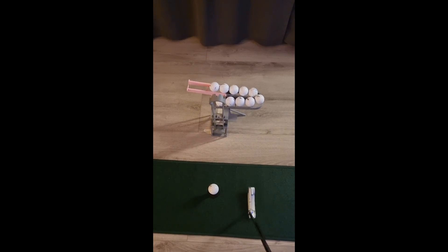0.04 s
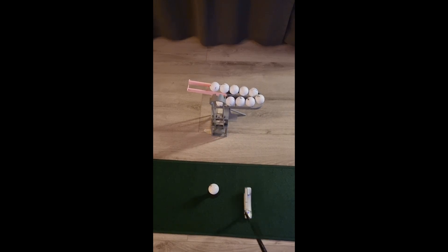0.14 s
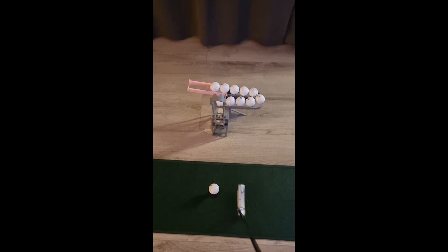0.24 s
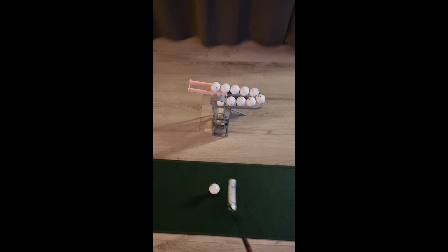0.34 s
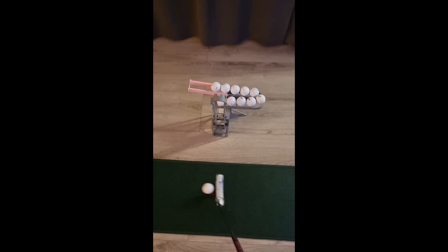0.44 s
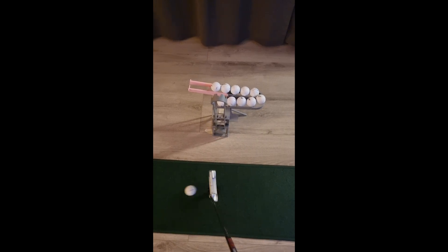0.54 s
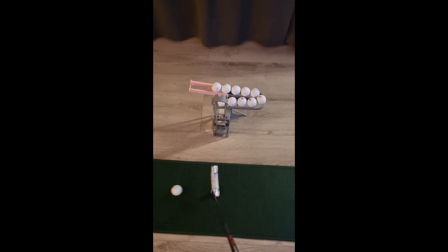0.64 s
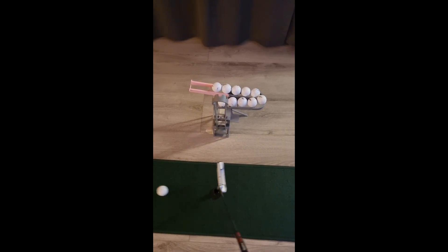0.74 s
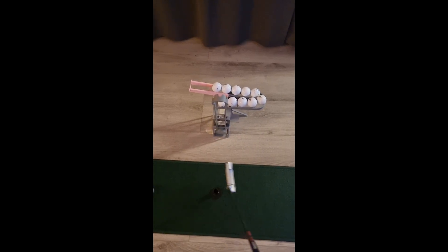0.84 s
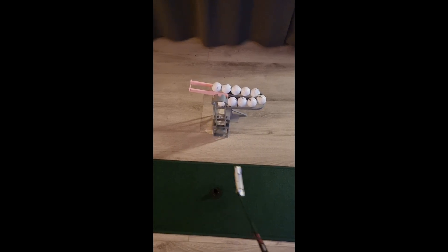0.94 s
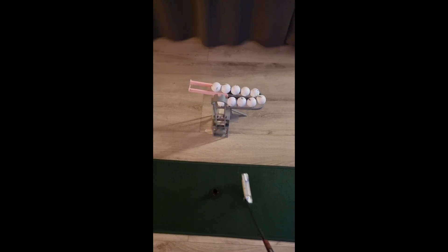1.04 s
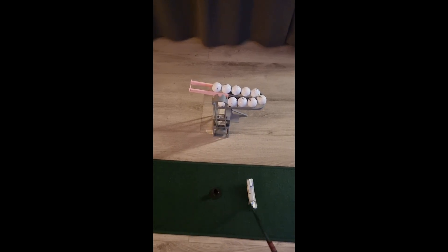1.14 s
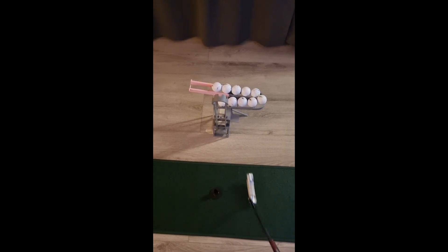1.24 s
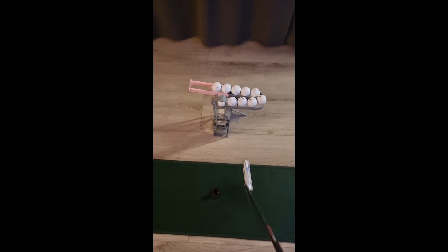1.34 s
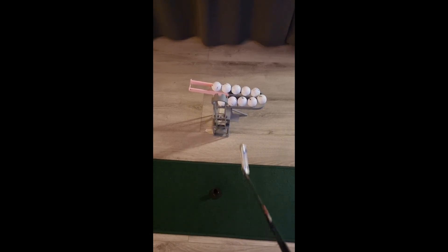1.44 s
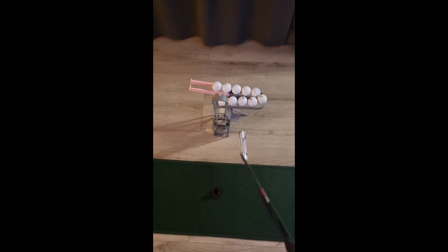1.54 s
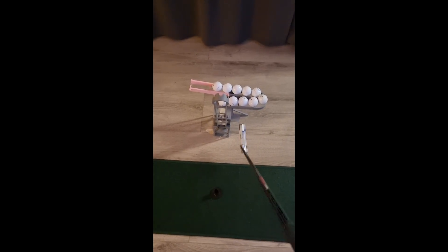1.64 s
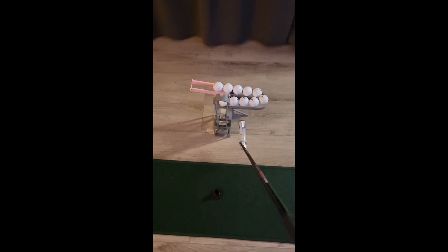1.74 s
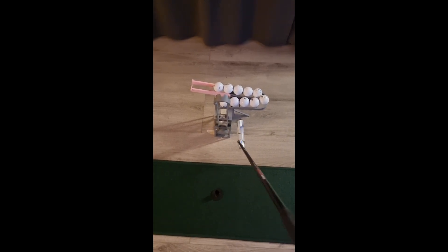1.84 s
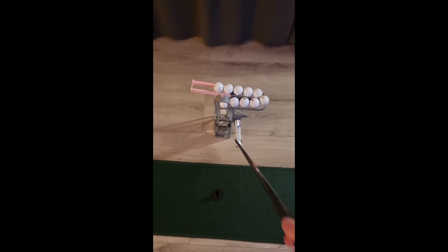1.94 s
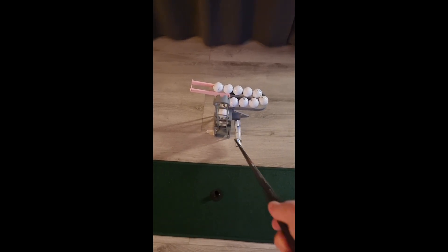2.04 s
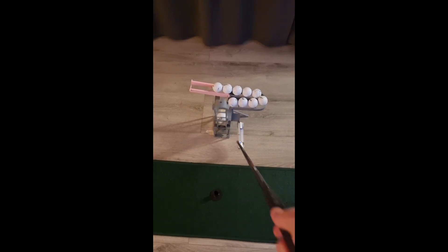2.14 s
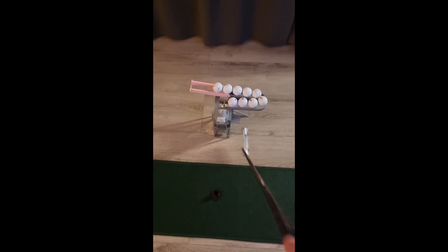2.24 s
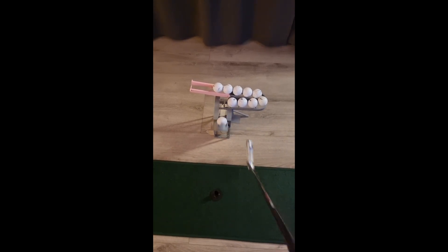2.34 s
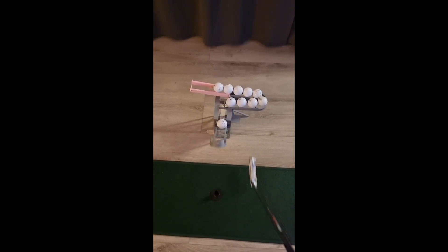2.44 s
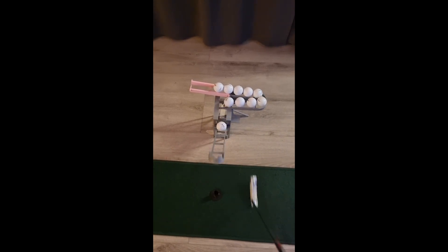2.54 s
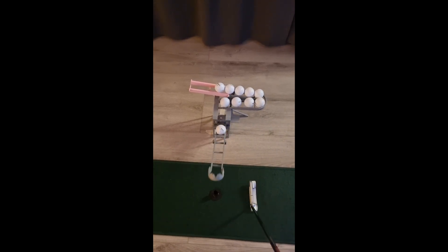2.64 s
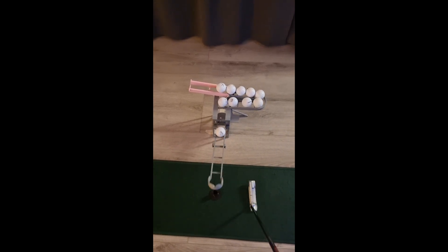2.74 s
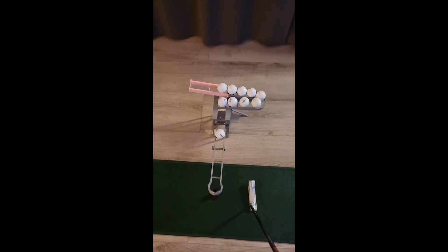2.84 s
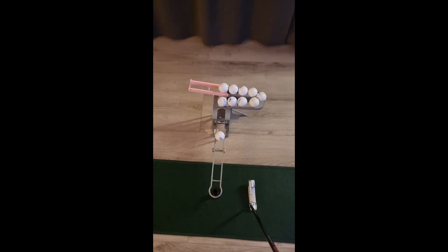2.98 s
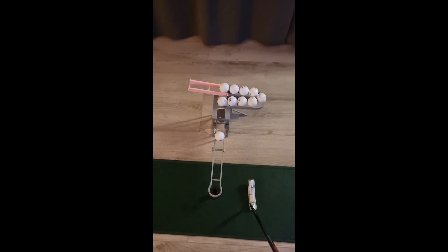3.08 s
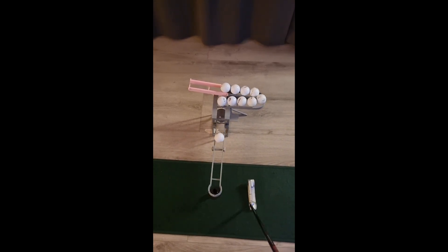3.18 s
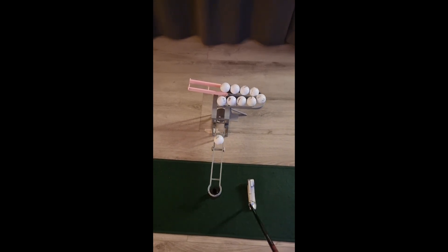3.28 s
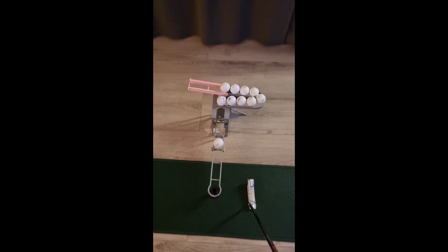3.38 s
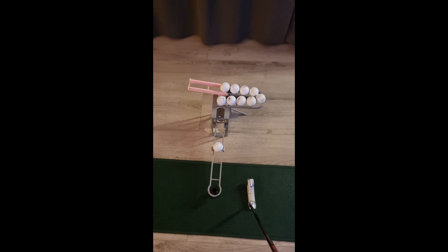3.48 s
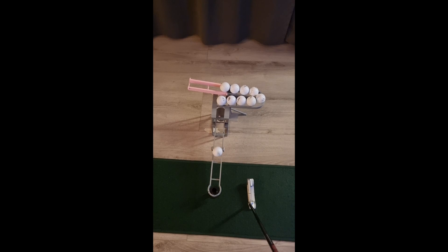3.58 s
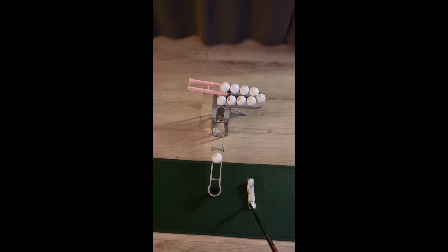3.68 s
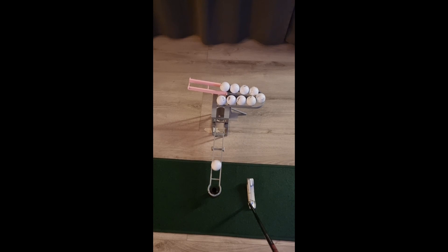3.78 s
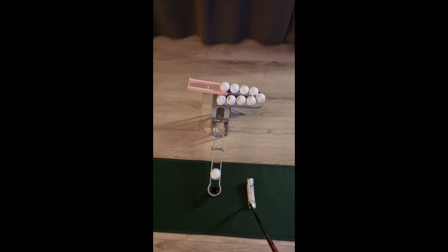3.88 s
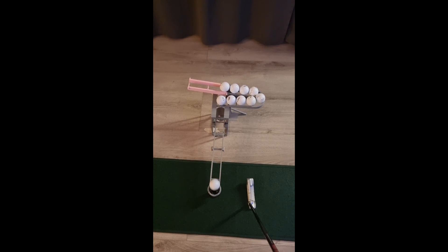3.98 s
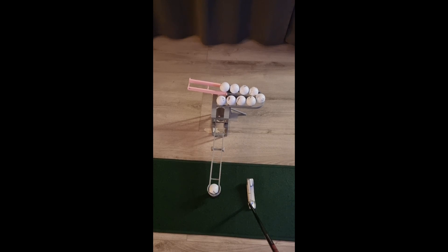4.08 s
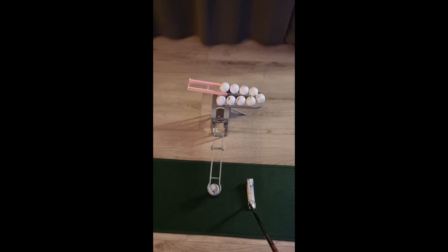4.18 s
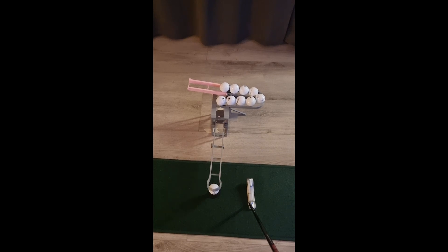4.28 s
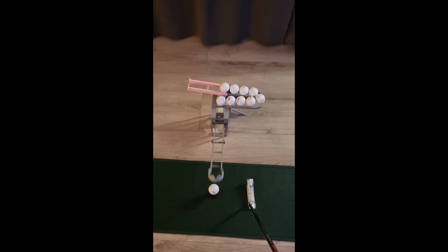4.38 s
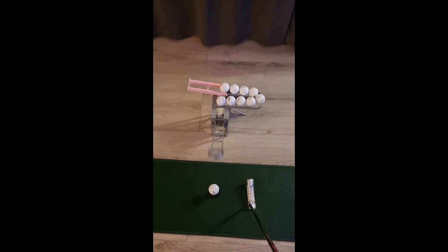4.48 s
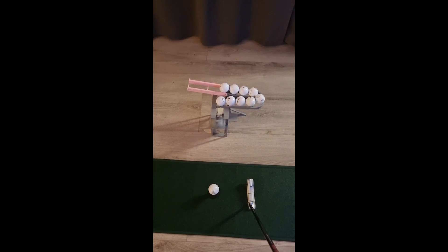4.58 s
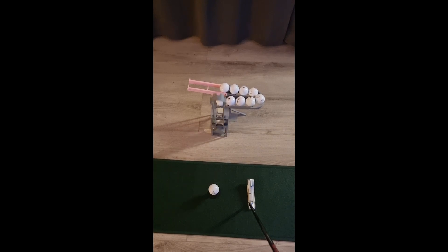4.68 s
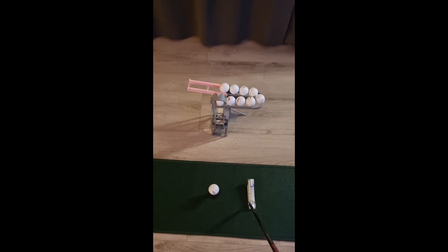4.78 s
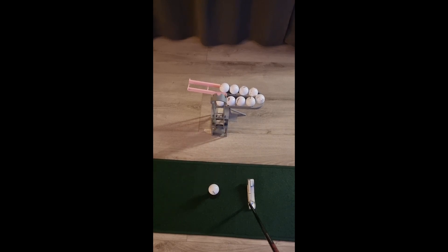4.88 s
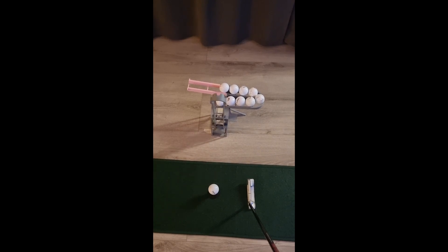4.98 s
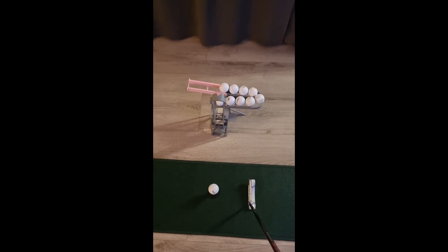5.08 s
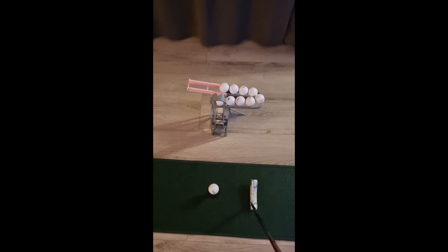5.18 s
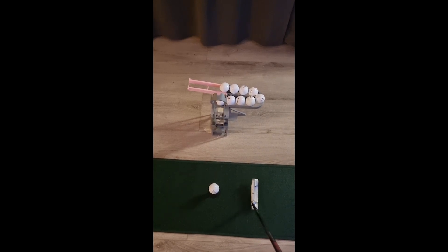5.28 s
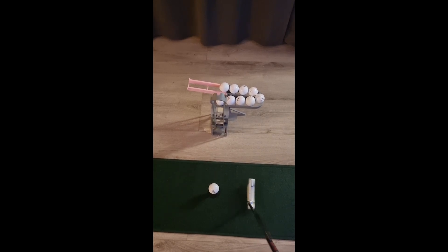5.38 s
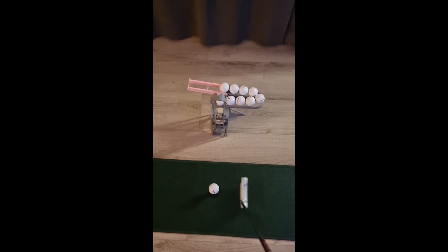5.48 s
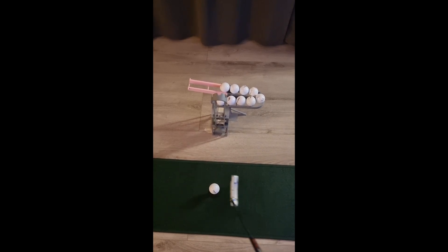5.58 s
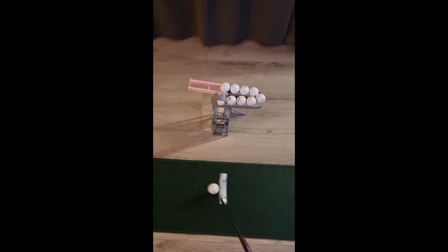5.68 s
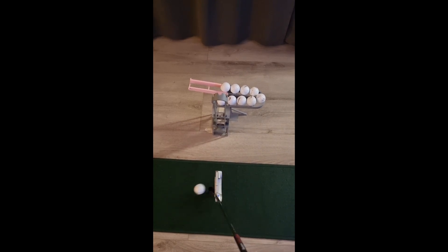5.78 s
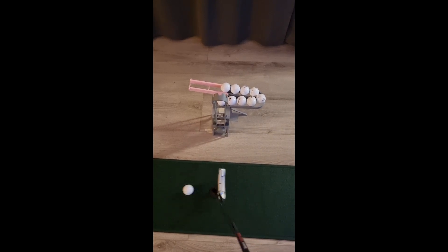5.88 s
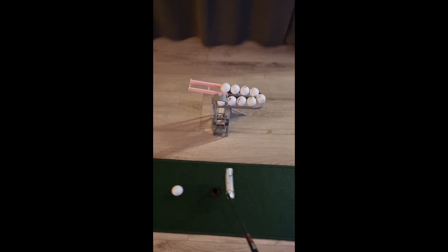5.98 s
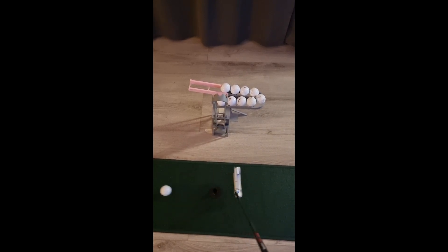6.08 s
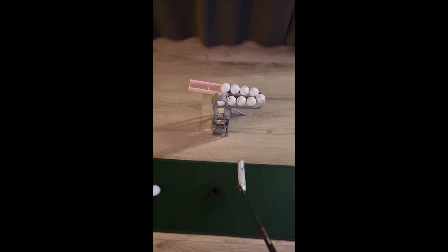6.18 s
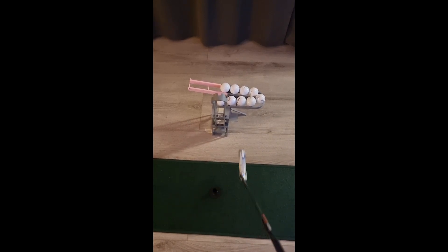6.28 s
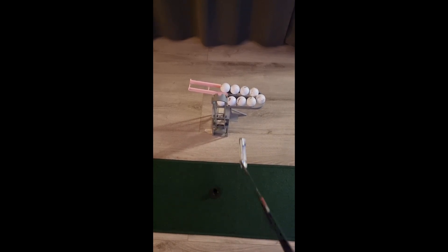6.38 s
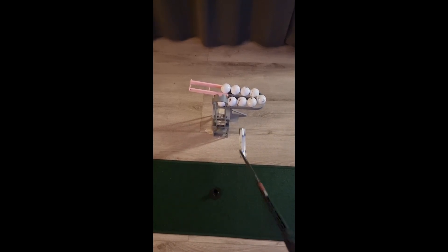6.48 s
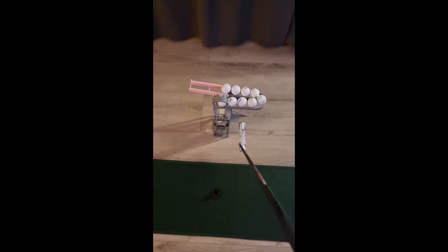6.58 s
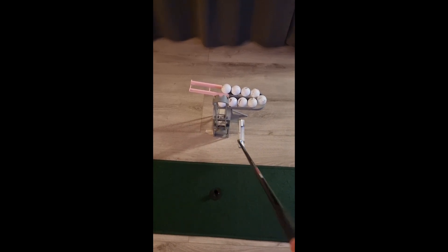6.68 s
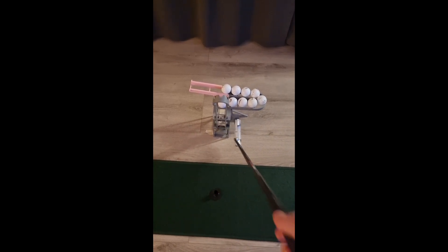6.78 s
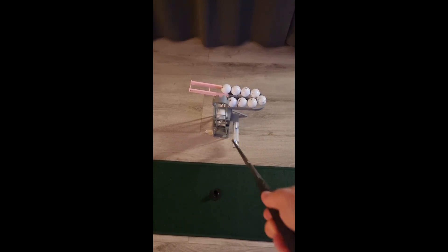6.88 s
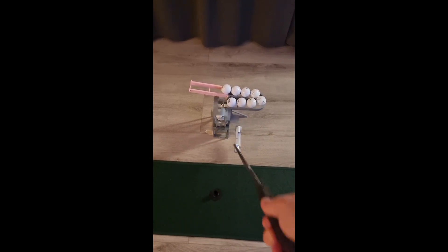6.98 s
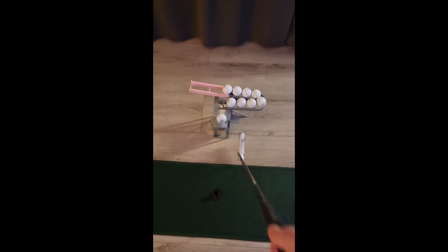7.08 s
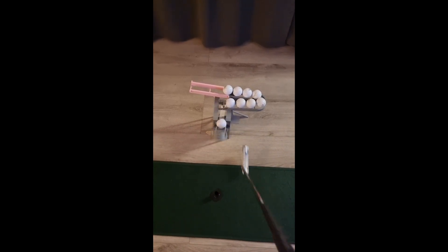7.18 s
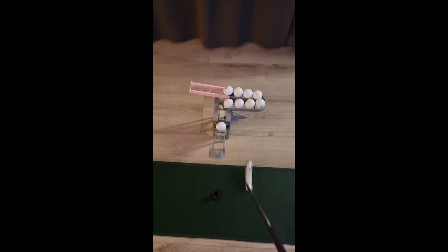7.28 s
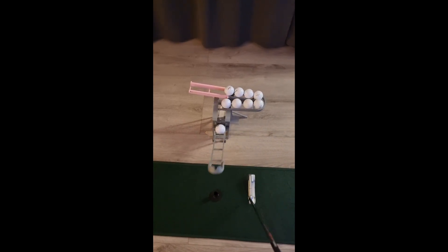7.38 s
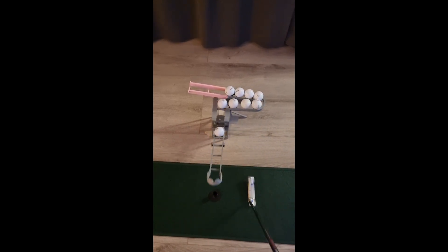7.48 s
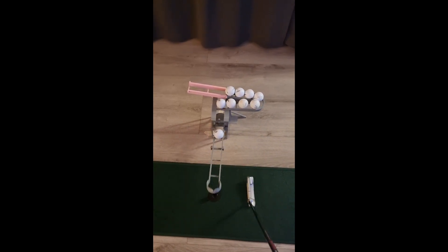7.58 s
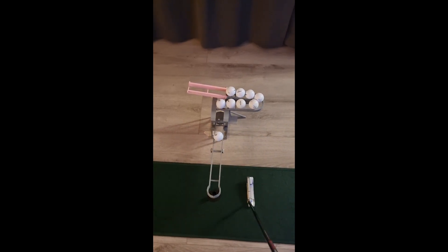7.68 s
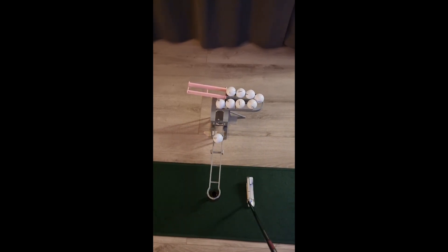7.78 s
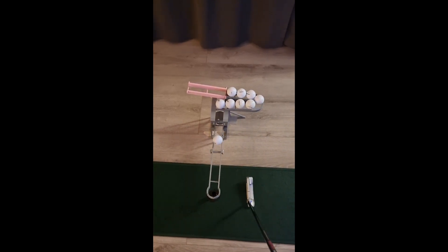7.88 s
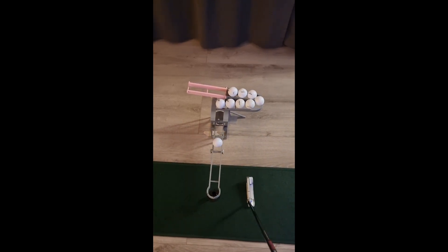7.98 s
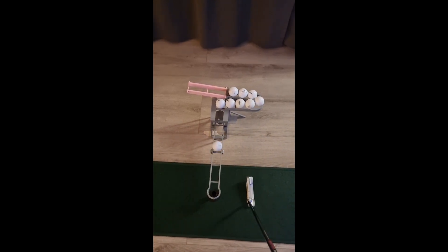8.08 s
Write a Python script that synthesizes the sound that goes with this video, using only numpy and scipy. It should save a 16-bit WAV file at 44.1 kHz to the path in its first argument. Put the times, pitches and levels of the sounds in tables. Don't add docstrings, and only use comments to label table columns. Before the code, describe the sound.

Two rounds of indoor putting: faint tap, dull thud, lever rattle, balls clacking, ramp knocking on wood, a ball rolling; the first ends with a slam.

```python
import sys
import numpy as np
from scipy import signal
from scipy.fft import rfft, irfft, next_fast_len
from scipy.io import wavfile
from scipy.ndimage import uniform_filter1d

SR = 44100
rng = np.random.default_rng(int(sys.argv[2]) if len(sys.argv) > 2 else 0)


def output_pcm(signal):
    pcm = np.clip(np.atleast_2d(signal).T, -1, 1) * 32767
    wavfile.write(sys.argv[1], SR, np.round(pcm).astype(np.int16))


def attenuation_scalar(level_db):
    decades = np.asarray(level_db, float) / 20
    return 10 ** decades


N = 358533

# f/Hz, density/dB per Hz
AIR = [(22, -16), (40, -5), (62, -7), (100, -9), (160, -4), (250, 1), (320, -5.5), (500, -9.5),
       (1000, -21.5), (2300, -32.5), (4000, -43), (8000, -55.5), (10500, -54), (12800, -44.5), (16000, -57)]
# f/Hz, correlation/1
SAME = [(30, 1), (180, 1), (550, 0.25), (1650, 0.52), (5000, 0.14)]
# t/s, peak level/dB,
# brightness/dB per octave
PUTTS = [
    (0.4858, -31, 2),
    (0.4935, -48, -4.5),
    (1.056, -50, 2.5),
    (5.7725, -30.5, -2),
    (5.7824, -38, 1.5),
    (5.80, -47, -2.5),
]
# f/Hz, level/dB
PUTTER = [(300, -22.5), (550, 4), (900, -7), (1700, 15.5), (2600, 0), (4100, 3.5), (6300, -16.5),
          (15000, -40)]
# f/Hz, level/dB, t60/s
BALL = [(300, -5.5, 0.06), (558, -6, 0.03), (810, 0.5, 0.02), (1250, -6, 0.03), (1850, -6, 0.015),
        (2578, -14, .05), (3100, -9.5, .012), (4050, -18, 0.045), (5000, -20, .015), (6300, -28, .04)]
# t/s, peak level/dB, contact/s
LANDINGS = [
    (0.616, -15.5, 0.0015),
    (0.636, -34, 0.0017),
    (0.727, -24, 0.0079),
    (0.772, -53, 0.008),
    (5.903, -16.5, 0.0011),
    (5.922, -35, 0.0022),
    (6.014, -29, 0.0048),
    (6.053, -44.5, 0.0047),
    (6.13, -58, 0.0018),
]
# f/Hz, level/dB, t60/s
BACKSTOP = [(79, -13, 0.26), (111, -1, 0.08), (165, 5, 0.071), (200.7, 3, 0.084), (219.7, -9.5, 0.18),
            (266.3, -5, 0.094), (312.7, -5, 0.12), (397, -13.5, 0.042), (520, -16.5, 0.038),
            (684, -16.5, 0.013), (825, -16, 0.011), (4530, -15, 0.02)]
# f/Hz, level/dB, t60/s
RACK = [(2000, -16, 0.015), (2760, -31, 0.013), (3050, -21.5, 0.025), (3190, -16.5, 0.038),
        (3400, -7.5, 0.0083)]
# f/Hz, level/dB, t60/s
HOLLOW = [(736, -3, 0.03), (800, -3, 0.025), (880, -6, 0.022), (1300, -2, 0.014)]
# f/Hz, level/dB, t60/s
WIRE = [(2230, -10, .06), (2290, -4, .11), (2345, -8, .06), (2395, -3, .14), (2470, -9, .06),
        (3250, -17, .05), (3420, -16, .07), (5300, -21, .05)]
# f/Hz, level/dB
SNAP = [(6800, 1), (7900, 3), (9500, -5.5), (11200, -5.5), (13200, -3), (15800, -7.5)]
SHELL = [(1200, -8), (1750, 0), (2300, 1.5), (3300, -3.5), (4600, 4.5), (5800, -12), (7600, -15.5)]
RAILS = [(1200, 3.5), (2000, 3.5), (3000, -14), (4700, -15), (7000, -42.5)]
HOUSING = [(290, -2.5), (500, -10.5), (760, -3.5), (1000, -3), (1600, -7.5)]
FIZZ = [(4200, -3), (5200, 0.5), (6500, -7.5), (7600, -5.5), (9200, -2.5), (11000, -13.5), (15000, -20)]
# t/s, peak level/dB, own ring f/Hz, relative snap/dB
LEVER = [(1.9622, -27, 3800, -6), (1.9889, -31, 3910, -32), (2.0074, -30.5, 3796, -40),
         (2.0344, -36.5, 3234, -22), (2.06, -43.5, 2100, -23.5), (2.0872, -31, 1010, -24),
         (2.1321, -31.5, 5640, -14.5), (2.151, -23.5, 2130, -13), (2.1644, -33, 2294, -17),
         (2.18, -38.5, 2356, -17), (2.2, -42.5, 1900, -17), (2.232, -36, 5426, -15),
         (6.775, -55.5, 2276, -20), (6.822, -52, 5000, -9), (6.8401, -21, 3690, -2),
         (6.8804, -27.5, 3470, -20), (6.86, -29, 3463, -19), (6.9042, -33, 3100, -14.5),
         (6.917, -33, 6240, -13), (6.9516, -28, 920, -28.5), (6.9601, -25.5, 3290, -17.5)]
# t/s, peak level/dB, own ring f/Hz, relative snap/dB
SHUNTS = [(2.2493, -18, 3800, -9), (2.2684, -8.5, 3220, -15.5), (2.277, -31, 3320, -19.5),
          (2.3095, -21.5, 3060, -21), (2.3401, -26.5, 3120, -21), (2.358, -32.5, 3094, -20.5),
          (6.981, -16, 3630, -13), (6.9921, -9, 3070, -14), (7.0086, -29, 3400, -15),
          (7.0452, -20.5, 3190, -16.5), (7.077, -20, 3050, -17.5)]
# t/s, peak level/dB, own ring f/Hz, relative snap/dB
DROPS = [(2.4618, -45.5, 3960, -26), (2.4827, -36, 2144, -20), (2.4887, -33, 2170, -19),
         (2.52, -67.5, 3800, -11.5), (2.6273, -54, 1690, -8.5), (2.7317, -50, 1670, -44),
         (2.794, -52.5, 3050, -29), (2.8345, -49.5, 1720, -25), (2.8524, -41.5, 3140, -27),
         (2.8883, -48, 3270, -37.5), (3.0445, -53, 3130, -40), (3.075, -61, 3280, -5),
         (3.0815, -34, 2060, -19), (3.0874, -33.5, 2170, -13), (3.097, -39.5, 2230, -25.5),
         (3.1835, -45.5, 2220, -8), (3.1955, -54.5, 2300, 7), (7.2275, -30, 1230, -19.5),
         (7.2382, -27.5, 2140, -12.5), (7.255, -37.5, 2300, -23), (7.285, -48, 2940, -23),
         (7.2943, -30.5, 2180, -21.5), (7.4441, -53.5, 1730, -6), (7.5915, -40.5, 3070, -40),
         (7.6273, -63, 2060, -38), (7.644, -45.5, 3760, -40), (7.662, -58, 3000, -30.5),
         (7.6845, -43.5, 2200, -22), (7.7749, -54, 3400, -21.5), (7.8448, -52, 1640, -17),
         (7.854, -42, 1950, -14.5), (7.879, -54.5, 3400, -26), (7.9632, -48, 3600, -16),
         (7.9758, -52, 3530, -15), (8.012, -47, 780, -22)]
# t/s, peak level/dB, own ring f/Hz, relative snap/dB
RETURN = [(4.12, -20.5, 3310, -27), (4.1235, -17.5, 3274, -20), (4.1325, -23.5, 2330, -10),
          (4.156, -22, 2220, -6), (4.164, -25.5, 4800, -12.5), (4.1744, -19, 2290, -18.5),
          (4.186, -42.5, 2370, -20.5), (4.2, -33, 3100, -20), (4.214, -49.5, 2370, -15),
          (4.238, -34.5, 3000, -23), (4.2562, -37, 2300, -20.5), (4.4463, -32, 3660, -33.5),
          (4.4505, -37.5, 3460, -38), (4.465, -56, 3480, -14), (4.6888, -57, 1620, -38),
          (4.708, -54, 2230, -18.5), (4.7353, -50.5, 1640, -33), (4.1245, -27, 12520, -5),
          (4.16, -39, 12500, -10)]
# t/s, peak level/dB, own ring f/Hz, relative snap/dB
SLAM = [
    (4.7505, -24.5, 4180, -12),
    (4.7565, -23, 6120, -12.5),
    (4.761, -18, 3196, -12),
    (4.7648, -14.5, 2287, -7.5),
    (4.7658, -15, 13190, -5.5),
    (4.79, -31, 3340, -21.5),
    (4.815, -39, 4360, -18.5),
]
# t/s, peak level/dB, own ring f/Hz, relative snap/dB
BUMPS = [(3.449, -67, 1280, -45.5), (3.527, -62.5, 2330, -36), (3.5565, -66.5, 1180, -30),
         (3.634, -57.5, 1170, -28), (3.648, -63, 1125, -32.5), (3.676, -45.5, 1000, -27.5),
         (3.715, -63, 3460, -23), (3.761, -67, 2320, -27), (3.7934, -45.5, 2226, -31),
         (3.815, -59, 3400, -12), (3.8623, -52, 2420, -28), (3.9286, -48, 1200, -31),
         (3.95, -50, 2360, -19.5), (4.0, -47, 870, -27), (4.0394, -44.5, 2340, -32),
         (4.06, -45.5, 900, -27)]
# blows, hollow body/dB for a medium blow, rack share/dB,
# chatter/s, buzz level/dB, buzz/s, own ring/dB, crack/dB
PARTS = [
    (LEVER, -19, -6.5, 0.005, -13.5, 0.016, 3.3, -5.5),
    (SHUNTS, -20, 0, 0.0016, -33, 0.0082, 2.8, 0.5),
    (DROPS, -9.5, -10, 0.0042, -17.5, 0.0098, 7, -2.1),
    (RETURN, -11, 1, 0.0036, -25.5, 0.005, 2.5, 0),
    (SLAM, -19, -7, 0.0025, -27.5, 0.013, 2.8, 0.94),
    (BUMPS, 2, 0, 0.0046, -18.5, 0.0087, 12, -2.3),
]
# t/s, peak level/dB
TWANGS = [(2.488, -55), (3.086, -39), (3.18, -63), (4.126, -25.5), (4.156, -28), (4.179, -37.5),
          (4.213, -34), (4.256, -54), (4.451, -50.5), (4.763, -36), (7.237, -50), (7.294, -71),
          (7.685, -55), (7.854, -59.5)]
# t/s, peak level/dB, contact/s
THUMPS = [(2.088, -31, 0.001), (2.126, -50, 0.0016), (2.151, -28.5, 0.0017), (2.187, -35, 0.0018),
          (2.269, -42.5, 0.0027), (2.507, -40.5, 0.0059), (2.623, -14, 0.013), (2.777, -34.5, 0.0033),
          (3.012, -42, 0.0022), (4.122, -42, 0.0023), (4.134, -27, 0.00043), (4.158, -53, 0.0023),
          (4.757, -33.5, 0.00227), (4.789, -35, 0.0012), (6.954, -26, 0.00032), (6.989, -25, 0.00092),
          (7.038, -52.5, 0.0048), (7.226, -35, 0.0012), (7.3, -38.5, 0.0021), (7.44, -24.5, 0.012),
          (7.678, -40.5, 0.012), (7.73, -37, 0.01), (7.842, -44.5, 0.011)]
# f/Hz, level/dB, t60/s
BOARDS = [(74.6, -9.5, 0.058), (108, -9.5, 0.05), (151.6, -4, 0.37), (157, -6, 0.11), (222, 1, 0.023),
          (295.3, -6, 0.57), (412.6, -31, 0.2)]
RUMBLE = [(76, -8, 0.066), (90.6, -9.5, 0.1), (153, -8, 0.09), (253, -8.5, 0.037), (319, -6.5, 0.05),
          (377.7, -10, 0.12)]
# t/s, vigour/dB, weight pressed into the floor/dB
RACK_RUNS = [
    [(1.96, -3.5, -18), (2.07, -8, -13), (2.136, -3.5, 1), (2.204, -6.5, 0), (2.364, -8.5, -16.5),
     (2.47, -26, -7)],
    [(6.84, -5.5, -46), (6.89, -2.5, -39.5), (6.94, -14, -34), (6.99, -2.5, 10.5), (7.094, -7.5, -4.5),
     (7.15, -17.5, -34), (7.2, -20, -8.5), (7.3, -37, 1.5), (7.4, -57, -19)],
]
# t/s, vigour/dB, weight pressed into the floor/dB
RAMP_RUNS = [
    [(2.68, -23, -25), (2.77, -11.5, -5.5), (2.854, 3.5, 4), (2.97, -65, -14.5), (3.034, -7.5, -9.5),
     (3.3, -16.5, -15)],
    [(3.3, -32, -21), (3.45, -21, -16.5), (3.68, -9, -6.5), (3.76, -11.5, -4), (3.84, -6.5, -7),
     (3.95, -3.5, -7), (4.098, -3, -1), (4.2, -7, -7.5), (4.3, -15.5, -23)],
    [(7.5, -12.5, -2), (7.58, -16.5, -8.5), (7.662, 3.5, 3.5), (7.76, -21, -14.5), (7.984, -13, -12),
     (8.13, -14, -10.5)],
]
# level/dB at full vigour, slope/dB per dB of vigour
ON_RACK = [
    (-52, 0.9),
    (-64, 0.8),
    (-41.5, 1.86),
    (-46, 2),
]
ON_RAMP = [
    (-54.5, 1.26),
    (-82.5, 1.4),
    (-58, 1.16),
    (-79.5, 0.37),
]
# t/s, level/dB
SAG = [
    [(2.68, -71), (2.75, -51), (2.9, -62), (3.1, -67), (3.36, -67.5), (3.44, -59.5), (3.81, -57),
     (3.9, -68.5), (4.1, -75.5)],
    [(7.47, -74), (7.52, -54), (7.69, -53.5), (7.83, -57), (8.0, -63), (8.13, -64.5)],
]
# t/s, f/Hz, level/dB
SPAN = [
    (3.45, 703, -82),
    (3.59, 745, -70),
    (3.646, 770, -60),
    (3.706, 670, -57.5),
    (3.758, 795, -72),
    (3.788, 878, -64),
    (4.068, 843, -54),
    (4.104, 760, -73),
    (4.11, 810, -45),
]
# f/Hz, t60/s
ROOM = [(100, 0.38), (500, 0.36), (2500, 0.33), (6000, 0.19), (14000, 0.14)]
# delay t/s, left port lead/samples, level/dB
EARLY = [
    (.0013, 4.5, -6),
    (.0041, -3, -9.5),
    (.0089, 0.5, -9),
]
# f/Hz, left minus right/dB
PORTS = [(60, -0.5), (130, -.5), (290, -1.5), (640, 2.5), (1410, -.5), (3100, -1.5), (6820, 3.5),
         (15000, 0)]

RING_S = (.15, .02, .1, .02, .2)
MAIN_TOUCH_S = .0011


def evened(x):
    return x / np.sqrt(np.mean(x ** 2) + 1e-20)


def read(points, hz):
    f, value = np.transpose(points)
    return np.interp(np.log(hz + 1), np.log(f + 1), value)


def add(mix, s, db, sound):
    part = mix[round(s * SR):][:len(sound)]
    part += attenuation_scalar(db) * sound[:len(part)] / abs(sound).max()


def butter(x, order, edge_hz, kind):
    return signal.sosfilt(signal.butter(order, edge_hz, kind, fs=SR, output="sos"), x)


def excite(force, response):
    return signal.fftconvolve(force, response)[:len(force)]


def ring(modes, length=0.1, detune=0., spread_db=0., sign=-1.0104):
    hz, db, t60 = np.transpose(modes)[:, :, None]
    chance = rng.standard_normal((2, len(modes), 1))
    t = np.arange(round(length * SR)) / SR
    level = attenuation_scalar(db + spread_db * chance[0] - 60 * t / t60)
    level *= sign ** np.arange(len(modes))[:, None]
    return (level * np.sin(2 * np.pi * hz * (1 + detune * chance[1]) * t)).sum(0)


def crowd(spectrum, t60, count):
    place = (np.arange(count) + rng.random(count)) / count
    hz = spectrum[0][0] * (spectrum[-1][0] / spectrum[0][0]) ** place
    return list(zip(hz, read(spectrum, hz), t60 * rng.uniform(0.32, 1.14, count)))


def chatter(length, tail_db=-27, tail=0.034, rise=1e-4):
    t = np.arange(5000) / SR
    size, often, buzz = rng.standard_normal((3, 5000))
    touches = size ** 2 * np.sign(size) * (abs(often) < .4)
    touches += 9 * (abs(t - MAIN_TOUCH_S) < .5 / SR)
    touches *= np.exp(-t / length)
    swell = (1 - np.exp(-t / rise)) * np.cos(t / t[-1] * np.pi / 2)
    return (touches + attenuation_scalar(tail_db) * buzz ** 3 * np.exp(-t / tail)) * swell


def air():
    frames, hz = N // 256 + 5, np.fft.rfftfreq(1024, 1 / SR)
    a, b, c, d, patches = rng.standard_normal((frames, 513, 5)).T
    patches = evened(uniform_filter1d(uniform_filter1d(patches, 8, axis=0), 14, axis=1))
    same = read(SAME, hz)[:, None]
    left = a + 1j * b
    right = same * left + np.sqrt(1 - same ** 2) * (c + 1j * d)
    z = np.array([attenuation_scalar(1.5) * left, attenuation_scalar(4.0) * right]) * attenuation_scalar(read(AIR, hz)[:, None] + patches)
    noise = signal.istft(z, nperseg=1024, noverlap=768)[1][:, :N]
    return attenuation_scalar(-61.5) * evened(noise)


def putts():
    out = np.zeros(N)
    head = crowd(PUTTER, 0.0017, count=90) + [(hz, db - 9, t60) for hz, db, t60 in BALL]
    for s, db, bright_db in PUTTS:
        tilted = [(hz, level + bright_db * np.log2(hz / 900), t60) for hz, level, t60 in head]
        touch = chatter(0.0017, tail_db=-20, tail=0.0077)
        click = butter(touch, 3, (1000, 3800), "band")
        rings = excite(touch, ring(tilted, detune=.015, spread_db=2.0))
        add(out, s, db, rings + attenuation_scalar(18.5) * click)
    return out


def thuds(rows, modes, lag, sign):
    out, body = np.zeros(N), ring(modes, length=0.78, sign=sign)
    for s, db, contact in rows:
        u = np.arange(800) / SR / contact
        add(out, s + lag, db, signal.fftconvolve(u * np.exp(-3 * u), body))
    return out


def landings():
    return thuds(LANDINGS, BACKSTOP, lag=.003, sign=-1.212)


def rolling():
    clumps = evened(uniform_filter1d(uniform_filter1d(rng.standard_normal(N), 900), 900))
    size = attenuation_scalar(3.2 * np.minimum(rng.exponential(1, N), 4) + 2.5 * clumps)
    ticks_per_s = 1100
    ticks = size * (rng.random(N) < ticks_per_s / SR) * rng.choice([-1, 1], N)
    spot, t, layers = rng.integers(0, 5, N), np.arange(N) / SR, np.zeros((5, N))
    for k in range(5):
        wire = [(hz, db + 8.5, t60) for hz, db, t60 in WIRE] + crowd(RAILS, 0.025, count=60)
        fizz = crowd(FIZZ, 0.012, count=50)
        hollow = HOLLOW + crowd(HOUSING, 0.0028, count=12)
        crunch = crowd(SHELL, 0.013, count=50)
        for layer, modes, lasts in zip(layers, (wire, fizz, hollow, crunch, RUMBLE), RING_S):
            body = ring(modes, length=lasts, detune=0.007, spread_db=5.0)
            layer += signal.oaconvolve(ticks * (spot == k), body)[:N]
    out = sag(ticks) + span(ticks)
    layers = [evened(layer) for layer in layers]
    for runs, coupling in ((RACK_RUNS, ON_RACK), (RAMP_RUNS, ON_RAMP)):
        for s, vigour_db, weight_db in map(np.transpose, runs):
            fade = np.clip(np.minimum(t - s[0], s[-1] - t) / 0.0038 + .5, 0, 1)
            vigour = np.interp(t, s, vigour_db)
            for layer, (db, slope) in zip(layers, coupling):
                out += fade * attenuation_scalar(db + max(slope, .4) * vigour) * layer
            out += fade * attenuation_scalar(-50 + np.interp(t, s, weight_db)) * layers[4]
    return out


def clacks():
    out = np.zeros(N)
    for blows, housing_db, rack_db, length, buzz_db, buzz_s, own_db, crack_db in PARTS:
        for s, db, hz, snap_db in blows:
            touch = chatter(length, tail_db=buzz_db, tail=buzz_s, rise=.00089)
            t = np.arange(len(touch)) / SR
            first = touch * np.exp(-t / .006)
            rack = [(f, level + rack_db, t60) for f, level, t60 in RACK]
            clear = ring(rack + [(hz, own_db, .017)], length=0.07, detune=0.03, spread_db=4.0)
            focused = [(f, level - 2 * abs(np.log2(f / hz)), t60)
                       for f, level, t60 in crowd(SHELL, 0.0036, count=70)]
            shell = ring(focused, length=.025, spread_db=2.5) * attenuation_scalar(-2.0)
            edges = np.minimum(hz * 2 ** np.array([-1.1, 1.1]), SR / 2.2)
            crack = butter(touch, 2, edges, "band")
            hollow = ring(HOLLOW + crowd(HOUSING, 0.012, count=16), detune=0.0085, spread_db=5.0)
            add(out, s, db, excite(first, clear) + excite(touch, shell) + attenuation_scalar(crack_db + 14.5) * crack)
            hollow_db = db + housing_db + 0.0861 * (db + 30)
            add(out, s, hollow_db, signal.fftconvolve(touch, hollow))
            delayed = touch * (1 - np.exp(-t / .00098))
            snap = ring(crowd(SNAP, 0.0026, count=70), length=.02)
            add(out, s, db + snap_db + 0.5, signal.fftconvolve(delayed, snap))
    twangs(out)
    return butter(out, 3, 261, "high")


def twangs(out):
    for s, db in TWANGS:
        rattle = chatter(.012, tail_db=-24, tail=.04)
        add(out, s, db, signal.fftconvolve(rattle, ring(WIRE, length=.55, detune=.006, spread_db=1.5)))


def thumps():
    return thuds(THUMPS, BOARDS, lag=.0026, sign=.91)


def resonate(x, hz, width):
    turn, r = np.exp(2j * np.pi * np.cumsum(hz) / SR), np.exp(-np.pi * width / SR)
    return 2 * (turn * signal.lfilter([1 - r], [1, -r], x / turn)).real


def sag(ticks):
    t, hz = np.arange(N) / SR, np.full(N, 84)
    hum = evened(resonate(resonate(ticks, hz, 20), hz, 50))
    hum *= attenuation_scalar(4 * np.sin(2 * np.pi * 17 * t))
    return hum * sum(attenuation_scalar(np.interp(t, s, db, -120, -120)) for s, db in map(np.transpose, SAG))


def span(ticks):
    t, (s, hz, db) = np.arange(N) / SR, np.transpose(SPAN)
    pitch = np.interp(t, s, hz)
    fade = np.clip(np.minimum(t - s[0], s[-1] - t) / .02 + .5, 0, 1)
    song = evened(resonate(resonate(ticks, pitch, 160), pitch, 300))
    return fade * attenuation_scalar(-3 + np.interp(t, s, db)) * song


def later(x, lead, wrap_hz):
    size = next_fast_len(N)
    hz = np.fft.rfftfreq(size, 1 / SR)
    delay = lead / SR / (1 + (wrap_hz / (hz + 1)) ** 2)
    return irfft(rfft(x, size) * np.exp(-2j * np.pi * hz * delay), size)[:N]


def ports(x, lead, wrap_hz):
    return np.array([later(x, -lead / 2, wrap_hz), later(x, lead / 2, wrap_hz)])


def heard(x, lead, room_db, wrap_hz=700):
    taps = np.zeros((2, SR // 2))
    at = np.arange(160, SR // 2 - 20, 20) + rng.integers(0, 20, (2, (SR // 2 - 161) // 20))
    np.put_along_axis(taps, at, rng.choice([-1., 1.], at.shape), 1)
    hz, t, z = signal.stft(taps, SR, nperseg=256)
    same = 1 / (1 + (hz[:, None] / 600) ** 4)
    z[1] = same * z[0] + np.sqrt(1 - same ** 2) * z[1]
    tail = signal.istft(z * attenuation_scalar(-60 * t / read(ROOM, hz)[:, None]), SR, nperseg=256)[1]
    tail *= attenuation_scalar(room_db) / np.linalg.norm(tail[0])
    direct = ports(x, lead, wrap_hz)
    for s, skew, db in EARLY:
        late = np.pad(x, (round(s * SR), 0))[:N]
        direct += attenuation_scalar(db) * ports(late, skew, 700)
    return attenuation_scalar(-1.0) * direct + signal.fftconvolve(x[None], tail, axes=1)[:, :N]


def scene():
    dispenser = heard(clacks() + rolling() + thumps(), lead=14.3, room_db=-5.0)
    putter = heard(putts(), lead=9.2, room_db=-12.5)
    backstop = heard(landings(), lead=-13.4, room_db=-5.5, wrap_hz=60)
    return butter(dispenser + putter + backstop, 7, 60., "high") + air()


def top_cut(x):
    return signal.sosfilt(signal.butter(12, 16810, fs=SR, output="sos"), x)


def record(dry):
    size = next_fast_len(N)
    hz = np.fft.rfftfreq(size, 1 / SR)
    tilt_db = read(PORTS, hz) / 2
    response = attenuation_scalar([tilt_db, -tilt_db]) * (hz < 15900)
    mix = irfft(rfft(dry, size) * response, size)[:, :N]
    return top_cut(mix)


dry = scene()
out = record(dry)
output_pcm(out)
```